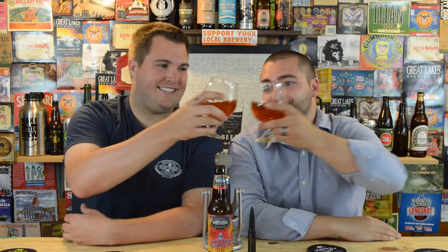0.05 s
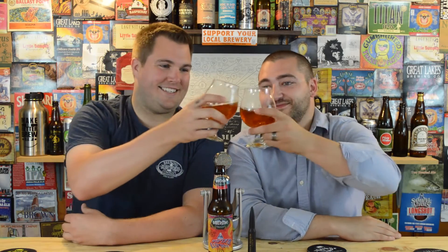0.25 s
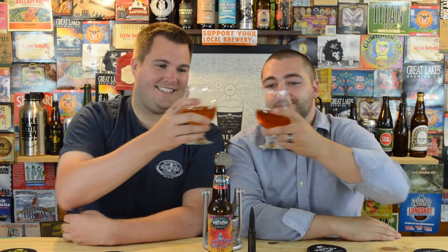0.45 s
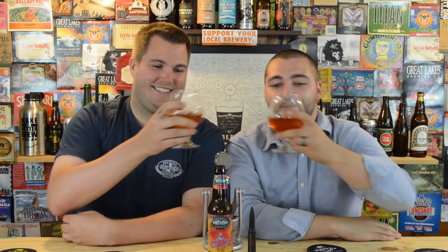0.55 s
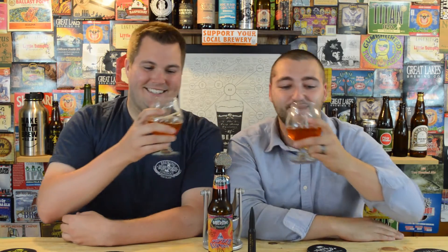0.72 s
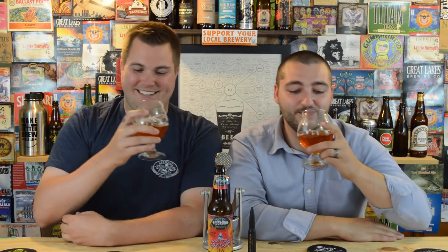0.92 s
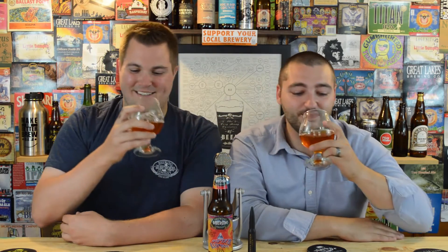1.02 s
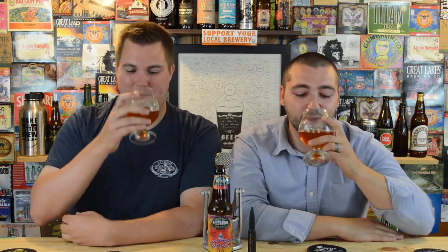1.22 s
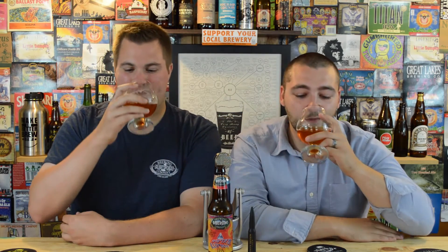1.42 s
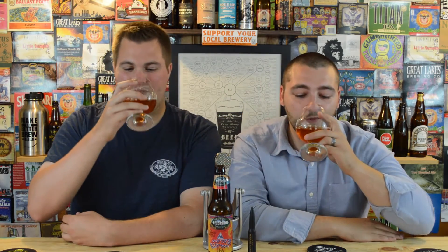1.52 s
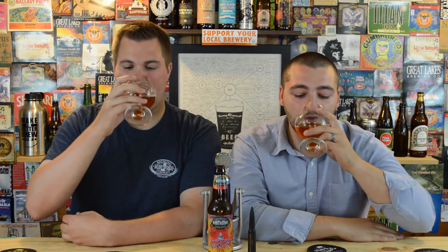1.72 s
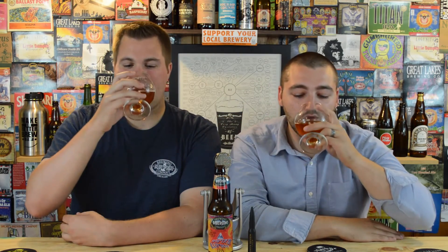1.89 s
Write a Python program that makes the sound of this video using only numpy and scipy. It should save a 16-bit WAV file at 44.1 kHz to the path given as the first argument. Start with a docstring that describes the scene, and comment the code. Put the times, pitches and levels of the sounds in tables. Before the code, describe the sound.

Two stemmed beer glasses clink together in a toast and ring briefly in a small room

```python
"""Ventilation rushes and rumbles in a small room, and sleeves rustle softly as filtered noise.
Two stemmed glasses of beer meet in a toast: the rims chatter for an instant with cracks of noise and
dull shoves, and both bowls ring out as fading sine tones, each blurred by a cluster of noise.
As the glasses are drawn back and tipped come faint noise clicks, soft low sine thuds and tiny ticks.
The low hum grows, most of all late on, then eases a little."""
import sys
import numpy as np
from scipy import signal
from scipy.fft import rfft, irfft, next_fast_len
from scipy.io import wavfile
from scipy.ndimage import map_coordinates

SR = 44100
rng = np.random.default_rng(int(sys.argv[2]) if len(sys.argv) > 2 else 0)


def transcribe(signal):
    """Save signal, clipped to [-1, 1], as a 16-bit WAV file at the path in sys.argv[1]."""
    frames = np.atleast_2d(signal).T
    limited = np.clip(frames, -1, 1)
    pcm = np.round(limited * 32767).astype(np.int16)
    wavfile.write(sys.argv[1], SR, pcm)


N = 85995  # length in samples

# Ringing modes of the two bowls: pitch_hz, relative level_db, t60_s (time to fall 60 dB),
# cluster_db (relative level of the short-lived cluster around the mode)
BOWL_MODES = [(885, -36, .12, -41), (1006, -27, 0.26, -44), (1041.5, -16, .48, -27.5),
              (1044.5, -39, 1.3, -55), (1120, -34.5, 0.21, -42), (1460, -38, .08, -41.5),
              (1822, -32, 0.033, -35.5), (2626, -34, .15, -30), (2733, -21, 0.35, -29),
              (5110, -32, 0.15, -33), (5365, -48, .15, -42.5), (7812, -40, 0.18, -40.5),
              (7990, -46.5, .2, -45.5), (8740, -46.5, .12, -39), (9500, -55, .1, -42.5),
              (10283, -48, .25, -48), (12540, -53.5, .15, -44.5), (14290, -61, .15, -54.5),
              (15506, -60.5, .15, -52.5)]


def amp(db):
    """Turn decibels into gain."""
    return 10 ** (np.asarray(db) / 20)


def unit(x):
    """Scale a sound to an rms of 1."""
    return x / np.sqrt(np.mean(x ** 2) + 1e-20)


def along(points, hz):
    """Read a curve of (pitch_hz, value) points, with pitch on a log axis."""
    point_hz, value = np.transpose(points)
    return np.interp(np.log(hz + 1), np.log(point_hz + 1), value)


def since(start_s):
    """Seconds passed since a moment, zero before it."""
    return np.maximum(np.arange(N) / SR - start_s, 0)


def fade(t, t60):
    """Exponential decay, 60 dB in t60 seconds, silent until t leaves zero."""
    return (t > 0) * amp(-60 * t / t60)


def wobble(rate):
    """A smooth random curve through `rate` random points a second."""
    points = rng.standard_normal(int(N * rate / SR) + 4)
    return map_coordinates(points, [np.arange(N) * rate / SR])


def filtered(x, response):
    """Multiply the spectrum of x by a gain that depends on frequency."""
    size = next_fast_len(N + SR // 2)  # spare room so the end does not wrap onto the start
    gain = response(np.fft.rfftfreq(size, 1 / SR))
    return irfft(rfft(x, size) * gain, size)[:N]


def noise(colour):
    """Noise of rms 1 whose spectrum follows (pitch_hz, level_db) points."""
    return unit(filtered(rng.standard_normal(N), lambda hz: amp(along(colour, hz))))


def band(centre_hz, octaves, skirt_db):
    """Noise of rms 1 in one broad hump over a flat skirt."""
    def hump(hz):
        distance = np.log2((hz + 1) / centre_hz) / octaves
        return np.exp(-.5 * distance ** 2) + amp(skirt_db)
    return unit(filtered(rng.standard_normal(N), hump))


def background():
    """Ventilation rush and drone, a rumble that swells and sinks, and a wavering hum that grows."""
    # Spectrum of the air rush: pitch_hz, relative level_db
    air_colour = [(60, -11.5), (110, -12), (170, -22), (240, -16.5), (350, -20.5), (480, -26.5),
                  (680, -38.5), (1000, -42), (1400, -43), (3000, -49), (9000, -50), (16000, -55)]
    # Spectrum of the rumble: pitch_hz, relative level_db
    rumble_colour = [(10, -0.5), (25, -3), (44, -9), (58, -8.5), (75, -22.5), (150, -45), (400, -89)]
    # Rumble over time: time_s, level_db
    rumble_level = [(0, -46), (.5, -53.5), (.75, -52), (1.05, -45.5), (1.15, -58), (1.42, -54),
                    (1.56, -56.5), (1.68, -53.5), (1.95, -48)]
    # Tones of the hum: pitch_hz, relative level_db
    hum_tones = [(117, -3), (232, 3)]
    # Hum over time: time_s, relative level_db
    hum_level = [(0, -81), (.9, -78), (1.3, -76.5), (1.6, -62.5), (1.95, -65.5)]
    air_db, drone_hz, drone_db = -64.5, 102.6, -65.5
    waver_rad, waver_rate = .4, 13  # slight phase wander, random points a second
    t = since(0)

    def level(rows):
        return amp(np.interp(t, *np.transpose(rows)))

    def tone(hz, db):
        return amp(db) * np.sin(2 * np.pi * hz * t + waver_rad * wobble(waver_rate))

    hum = level(hum_level) * sum(tone(hz, db) for hz, db in hum_tones)
    rumble = level(rumble_level) * noise(rumble_colour)
    air = amp(air_db) * noise(air_colour)
    return air + tone(drone_hz, drone_db) + rumble + hum


def sleeves():
    """Cloth brushes softly as the arms move: noise humps that swell and sink."""
    # Rustles: peak_s (may lie before the start), level_db, spread_s (bell-curve width), centre_hz
    rustles = [(-0.015, -73, 0.057, 890), (0.161, -79.5, 0.033, 1080), (.67, -75, 0.028, 3450),
               (.975, -80, 0.028, 3740)]
    width_oct, skirt_db = 0.99, -28.5
    out = np.zeros(N)
    for peak_s, db, spread_s, hz in rustles:
        swell = np.exp(-.5 * ((since(0) - peak_s) / spread_s) ** 2)
        out += amp(db) * swell * band(hz, width_oct, skirt_db)
    return out


def room(x):
    """The room's diffuse echo: a noise tail in which each frequency dies at its own speed."""
    # How long the echo lasts: pitch_hz, t60_s
    echo_t60 = [(100, .25), (400, 0.6), (1000, 0.85), (2700, 0.71), (5000, 0.75), (9000, .58),
                (15000, 0.42)]
    # Tone of the echo: pitch_hz, relative level_db
    echo_colour = [(60, -14.5), (350, -8), (750, 5), (1100, -3.5), (2000, -5.5), (2800, -1.5), (5000, -2.5),
                   (15000, -2.5)]
    delay_s, build_s = .004, .008
    hz, t, spectrum = signal.stft(rng.standard_normal(SR), SR, nperseg=256)
    decay = fade(t + 1 / SR, along(echo_t60, hz)[:, None])
    tail = signal.istft(spectrum * decay, SR)[1]
    tail = tail * (1 - np.exp(-since(delay_s)[:len(tail)] / build_s))
    wet = signal.fftconvolve(x, tail / np.linalg.norm(tail))[:N]
    return filtered(wet, lambda hz: amp(along(echo_colour, hz)))


def clusters(hz):
    """Gain for white noise that gives each bowl mode its cluster of close neighbours."""
    half_width_hz, growth = 39, .65  # half width at 1 kHz, and its power law with pitch
    power = 0
    for centre, _, _, db in BOWL_MODES:
        width = half_width_hz * (centre / 1000) ** growth
        peak = amp(db) ** 2 * SR / (np.pi * width)
        power = power + peak / (1 + ((hz - centre) / width) ** 2) ** 2
    return np.sqrt(power)


def clink():
    """Each rim contact cracks, shoves the glasses and adds a new ring of the bowls."""
    # Rim contacts: start_s, then relative ring_db, crack_db and push_db
    contacts = [(0.2128, -2, -1.5, -1), (0.2279, -13, -8.5, -3.5), (0.24, -1.5, -7.5, -8),
                (0.2601, -23, -17.5, -25.5)]
    # Spectrum of the crack of glass on glass: pitch_hz, relative level_db
    crack_colour = [(300, -21), (650, -7), (900, 10), (1350, 1), (1900, 5.5), (2300, -4), (3700, -8.5),
                    (4600, -15), (5300, -7.5), (6400, -21.5), (7800, -9), (9500, -12), (12500, -14),
                    (13100, -32), (14200, -24.5), (15600, -24)]
    ring_attack_s, cluster_t60_s = 0.0012, 0.096
    crack_base_db, crack_t60_s = -15, .022
    shimmer_db, shimmer_t60_s = -31.5, 0.075  # dense, quickly damped modes
    push_base_db, push_rise_s, push_low_hz = -14, 0.00076, 24.8  # the dull shove
    slosh_rad, slosh_rate = .22, 31  # beer moving in the bowls: phase wander, random points a second
    glass, push = np.zeros(N), np.zeros(N)
    slosh = [slosh_rad * wobble(slosh_rate) for _ in BOWL_MODES]
    for start_s, ring_db, crack_db, push_db in contacts:
        t = since(start_s)
        ring = fade(t, cluster_t60_s) * filtered(rng.standard_normal(N), clusters)
        for (hz, db, t60, _), waver in zip(BOWL_MODES, slosh):
            ring += amp(db) * fade(t, t60) * np.sin(2 * np.pi * hz * t + waver)
        glass += amp(ring_db) * ring * (1 - np.exp(-t / ring_attack_s))
        crack_shape = amp(crack_base_db) * fade(t, crack_t60_s)
        shimmer_shape = amp(shimmer_db) * fade(t, shimmer_t60_s)
        glass += amp(crack_db) * (crack_shape + shimmer_shape) * noise(crack_colour)
        # one smooth pulse: up in push_rise_s, then back down
        push += amp(push_base_db + push_db) * t / push_rise_s * np.exp(1 - t / push_rise_s)
    high_pass = signal.butter(2, push_low_hz, 'high', fs=SR, output='sos')
    return glass + signal.sosfilt(high_pass, push)


def swelling(x):
    """The level around three bowl pitches briefly dips or swells as they fade."""
    # Dips and swells: peak_s, centre_hz, change_db, spread_s (bell-curve width)
    level_changes = [(.378, 1040, -9.5, .012), (0.407, 1062, 6, 0.016), (0.458, 1070, 3, .012),
                     (.545, 1046, -5, .035), (0.38, 2766, -18, 0.018), (.53, 2670, 4, 0.013),
                     (0.679, 2728, 14, 0.0098), (.535, 5118, -7, .012), (.58, 5118, 5, .02)]
    width_hz = 37
    for peak_s, centre, db, spread_s in level_changes:
        ring = filtered(x, lambda hz: np.exp(-.5 * ((hz - centre) / width_hz) ** 2))
        bump = np.exp(-.5 * ((since(0) - peak_s) / spread_s) ** 2)
        x = x + ring * (amp(db * bump) - 1)
    return x


def clicks():
    """A quick run of faint, dry, wide-band noise clicks as the glasses part."""
    # Clicks: start_s, level_db
    click_list = [(0.7489, -51), (0.7618, -53), (.768, -57), (0.7713, -58)]
    # Spectrum of a click: pitch_hz, relative level_db
    click_colour = [(120, -14), (300, 12), (1500, 7.5), (5000, 1), (9000, -4.5), (11000, -24), (13500, -3),
                    (16000, -1)]
    t60_s = 0.0067
    return sum(amp(db) * fade(since(start_s), t60_s) * noise(click_colour) for start_s, db in click_list)


def thuds():
    """Soft low thuds: short fading sine tones, one under the first click, one giving body to the last tick."""
    # Thuds: start_s, level_db, pitch_hz, t60_s
    thud_list = [(.749, -53, 276, .12), (1.559, -67, 720, .04)]
    out = np.zeros(N)
    for start_s, db, hz, t60 in thud_list:
        t = since(start_s)
        out += amp(db) * fade(t, t60) * np.sin(2 * np.pi * hz * t)
    return out


def ticks():
    """Tiny ticks as the glasses are tipped: a broad noise hump and a brief tink at its centre."""
    # Ticks: start_s, level_db, centre_hz, t60_s, tink_db (relative to the tick)
    tick_list = [(1.1125, -65, 3000, .008, -23), (1.1295, -55, 3470, 0.011, -24),
                 (1.1446, -55.5, 5223, 0.0051, -23), (1.153, -61, 2576, 0.02, -12),
                 (1.1598, -63.5, 3020, 0.027, -17), (1.176, -76.5, 3950, 0.018, 6),
                 (1.559, -61, 3100, 0.0058, -9)]
    width_oct, skirt_db, tink_t60_s = 0.49, -29, .035
    out = np.zeros(N)
    for start_s, db, hz, t60, tink_db in tick_list:
        t = since(start_s)
        tap = fade(t, t60) * band(hz, width_oct, skirt_db)
        tink = amp(tink_db) * fade(t, tink_t60_s) * np.sin(2 * np.pi * hz * t)
        out += amp(db) * (tap + tink)
    return out


def scene():
    """Glasses and small noises with their room echo, over the background."""
    room_db = -11
    near = sleeves() + clink() + clicks() + thuds() + ticks()
    in_room = near + amp(room_db) * room(near)
    return (swelling(in_room) + background())[None]


def record(dry):
    """A steep low-pass filter removes nearly everything above its limit."""
    top_hz = 15900
    steep = signal.ellip(10, .1, 90, top_hz, fs=SR, output='sos')
    return signal.sosfilt(steep, dry)


dry = scene()
out = record(dry)
transcribe(out)
```